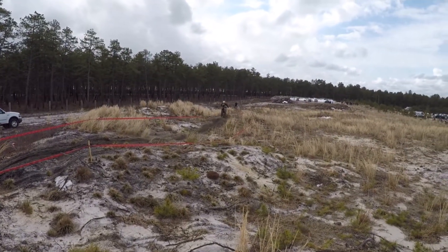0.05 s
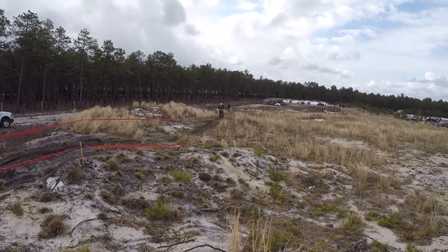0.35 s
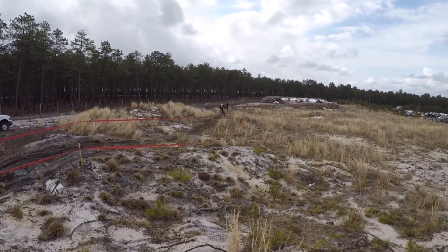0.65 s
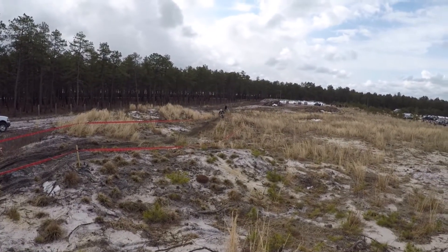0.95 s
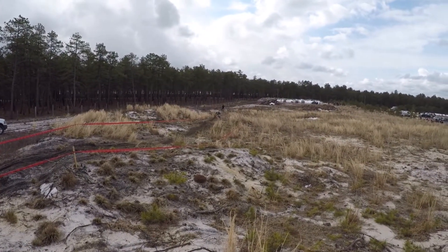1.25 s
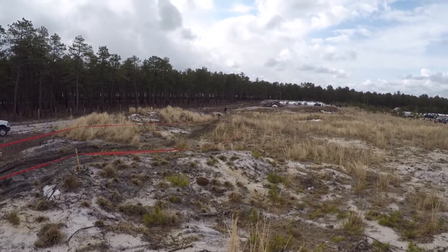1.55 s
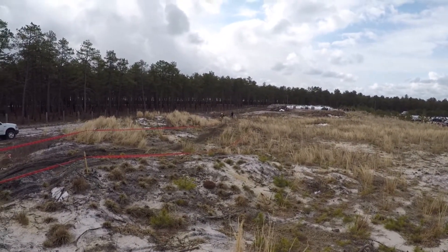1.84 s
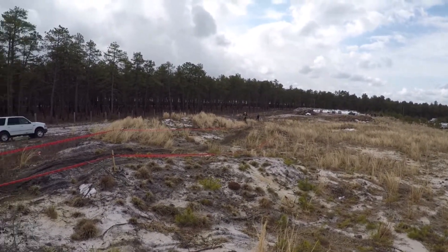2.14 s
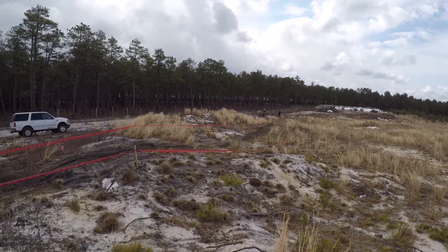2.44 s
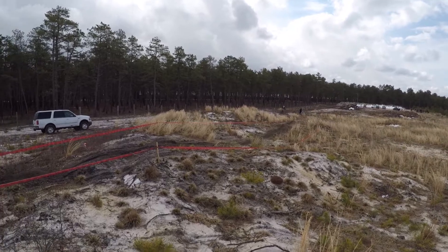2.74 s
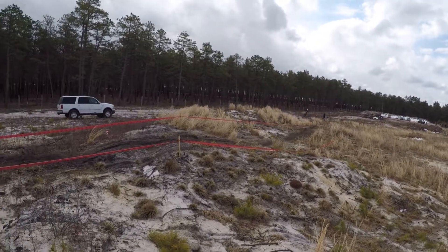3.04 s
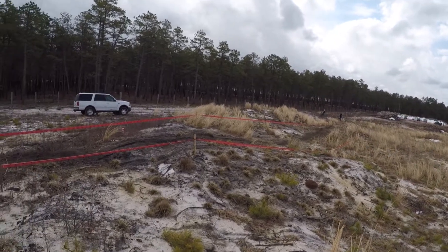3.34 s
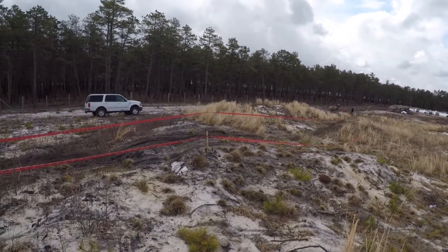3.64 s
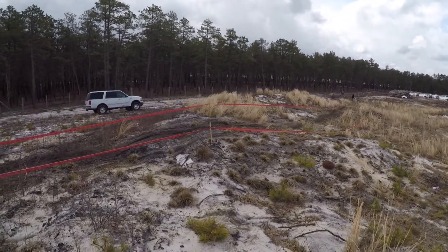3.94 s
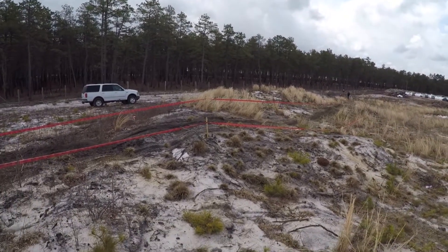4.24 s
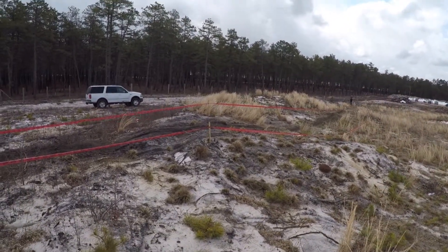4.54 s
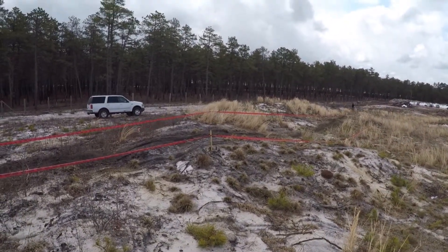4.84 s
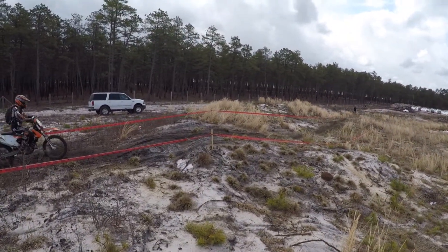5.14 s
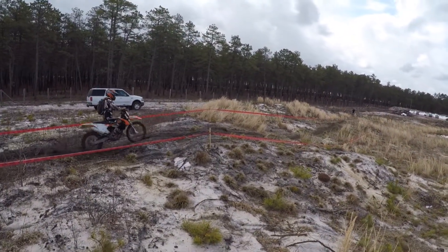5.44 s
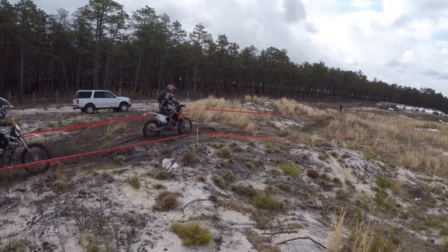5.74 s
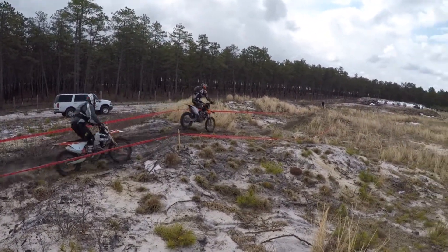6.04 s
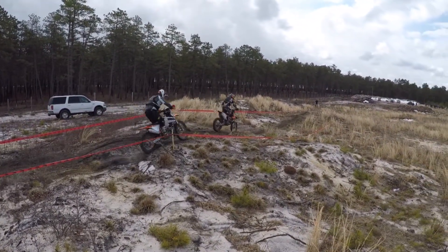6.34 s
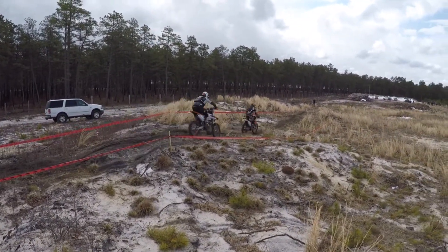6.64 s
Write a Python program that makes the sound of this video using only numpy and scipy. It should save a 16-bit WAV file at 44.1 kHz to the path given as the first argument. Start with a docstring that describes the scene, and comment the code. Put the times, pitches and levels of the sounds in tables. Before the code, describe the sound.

Dirt bike engines are heard throughout, outdoors, over a low idling throb, a distant engine din and a faint metallic clatter. A close bike gives a rasping rev at about 0.7 seconds and growls on until nearly 2 seconds, while another rides off, fading by about 3 seconds. Short, barking throttle blips come between 2.2 and 3.4 seconds. From 3.4 seconds a bike approaches, climbing unevenly in pitch, with a nasal intake honk around 4 seconds; another coasts behind it. Hoarse, more distant blips sound between 4 and 5 seconds. Sand hisses and a few small stones tick against metal from about 4 to 5.4 seconds. Two bikes pass close from 5.3 seconds with quick, cracking bursts and rattling chains, then a longer rising rev comes just after 6 seconds. Engines keep running until the end, near 7 seconds. Trees return a dull echo.

```python
"""Dirt bikes by a pine wood

Four-strokes on a sandy track: one rides off over the field, another pulls up through the revs with a
honking intake, and two pass close in short bursts of throttle. Each firing thumps the pipe, barks in
the muffler and lets out a cracking, rasping jet of gas. Underneath, more bikes idle, chains and valves
clatter and sand sprays; the trees return a dull echo."""
import sys
import numpy as np
from scipy import signal
from scipy.fft import rfft, irfft
from scipy.io import wavfile
from scipy.ndimage import uniform_filter1d, minimum_filter1d

SR = 44100
rng = np.random.default_rng(int(sys.argv[2]) if len(sys.argv) > 2 else 0)


def transcribe(signal):
    """Save signal, clipped to [-1, 1], as a 16-bit WAV file at the path in sys.argv[1]."""
    frames = np.atleast_2d(signal).T
    limited = np.clip(frames, -1, 1)
    pcm = np.round(limited * 32767).astype(np.int16)
    wavfile.write(sys.argv[1], SR, pcm)


N = 303408
TIME = np.arange(N) / SR


def gain_of(db):
    """Decibels to gain."""
    return 10 ** (np.asarray(db) / 20)

def unit_rms(x):
    """Scales to rms 1."""
    return x / np.sqrt(np.mean(x ** 2) + 1e-20)

def curve_at(points, hz):
    """Reads a curve on a log-frequency axis."""
    f, value = np.transpose(points)
    return np.interp(np.log(hz + 1), np.log(f + 1), value)

def colour(x, eq):
    """Minimum-phase EQ of unit energy, rolling off 20 dB an octave past the ends of its curve."""
    hz = abs(np.fft.fftfreq(16384, 1 / SR)) + 1
    octaves_out = np.maximum(np.log2(eq[0][0] / hz), 0) + np.maximum(np.log2(hz / eq[-1][0]), 0)
    log_gain = np.log(gain_of(np.maximum(curve_at(eq, hz) - 20 * octaves_out, -100)))
    taps = np.fft.ifft(np.exp(np.conj(signal.hilbert(log_gain)))).real[:4096]
    return signal.oaconvolve(x, taps / np.linalg.norm(taps))[:N]

def resonate(x, hz, width_hz):
    """A steep resonance of unit energy that follows the pitch curve hz."""
    carrier = np.exp(2j * np.pi * np.cumsum(hz) / SR)
    r = np.exp(-np.pi * width_hz / SR)
    baseband = signal.lfilter([(1 - r) ** 2], [1, -2 * r, r * r], x / carrier + 1e-18)
    return (carrier * baseband).real * np.sqrt(8 / (1 - r))

def train(times, sizes):
    """Impulses at the given times."""
    at = np.round(times * SR).astype(int)
    inside = (at >= 0) & (at < N)
    return np.bincount(at[inside], sizes[inside], N)

def puffs(pulses, decay_s, rise_s=0.00088):
    """Each impulse becomes a puff of turbulence of the same energy."""
    power = pulses ** 2 + 1e-20
    for r in np.exp(-2 / (np.array([decay_s, rise_s]) * SR)):
        power = signal.lfilter([1 - r], [1, -r], power)
    return np.sqrt(power) * rng.standard_normal(N)

def swell_at(s, spread_s):
    """A flat-topped swell of height 1."""
    return np.exp(-((TIME - s) / spread_s) ** 4 / 2) * (abs(TIME - s) < 2 * spread_s)

def running(x):
    """Mirrors a steady sound over its build-up, so it opens already going."""
    return np.pad(x[4096:], (4096, 0), "reflect")

def bumps(t):
    """Rough ground: a 2-9 Hz wobble, rms 1."""
    waves = (np.sin(2 * np.pi * (hz * t + rng.random())) for hz in np.geomspace(2, 9, num=12))
    return unit_rms(sum(waves))

def idle_beat(rate_hz, lope, uneven_db):
    """Loping firings of an engine at rest, rms 1."""
    gap, strength = rng.standard_normal((400, 2)).T
    fired = (np.cumsum(1 + lope * gap) - rng.random()) / rate_hz
    return unit_rms(train(fired, gain_of(uneven_db * strength)))

# Low end of the idling bikes: f/Hz, level/dB
IDLE_EQ = [(18, -60), (30, -22), (40, -6.5), (62, 0.5), (85, 2), (110, -0.5), (150, 1), (185, -12),
           (240, -14), (330, -28.5), (480, -24.5), (900, -63)]
# Their fader: t/s, level/dB
IDLE_FADER = [(0, -15.5), (1, -17), (3.2, -18), (4.2, -15), (6.88, -16)]
def idle_throb(beats):
    """The firings of bikes idling close by make a bassy throb."""
    return gain_of(np.interp(TIME, *np.transpose(IDLE_FADER))) * running(colour(beats, IDLE_EQ))

# Midrange wash of farther engines: f/Hz, level/dB
DIN_EQ = [(150, -15.5), (330, 11.5), (500, 1), (750, -2), (1050, -4), (1450, -1), (2000, -6), (3000, -10),
          (6000, -30)]
# Its fader, before trim: t/s, level/dB
DIN_FADER = [(0, -36.5), (.7, -33), (2.1, -28.5), (3.8, -29), (4.8, -26.5), (5.8, -32)]
def far_din(trim_db=-1):
    """The firings of farther engines smear into a din."""
    level = gain_of(trim_db + np.interp(TIME, *np.transpose(DIN_FADER)))
    return level * running(colour(puffs(idle_beat(75, .15, 0.46), 0.028), DIN_EQ))

# Metallic edge of valves and chains: f/Hz, level/dB
CLATTER_EQ = [(1000, 10), (2400, -8), (3700, 3), (5100, -4), (6300, -2.5), (7500, -6.5), (8700, -21),
              (12000, -28)]
def clatter(beats, valve_db=-44.5, chain_db=-35, pass_s=5.64, pass_width_s=1):
    """Valves rattle throughout; chains swell as the passing bikes come nearest."""
    nearness = 1 / (1 + ((TIME - pass_s) / pass_width_s) ** 4)
    level = np.hypot(gain_of(valve_db), gain_of(chain_db) * nearness)
    return level * running(colour(puffs(beats, 0.035, rise_s=0.0064), CLATTER_EQ))

def firings(run):
    """The moments at which an engine fires during one run."""
    s, rate = np.transpose(run)[:2]
    t = np.arange(s[0], s[-1] + .25 / rate[-1], 1 / SR)
    cycles = np.cumsum(np.interp(t, s, rate)) / SR
    return np.interp(np.arange(int(cycles[-1]) + 1), cycles, t)

def pressure_front(sweep_s=0.002555, top_hz=2200):
    """The pressure front leaves the pipe as a quick upward chirp."""
    hz = np.fft.rfftfreq(512, 1 / SR)
    delay = sweep_s * np.minimum(hz / top_hz, 1)
    return irfft(np.exp(-2j * np.pi * np.cumsum(delay) * hz[1]))

def sway(depth_db):
    """Gain that wanders as a bike bucks over the bumps and its pipe swings about."""
    t = np.arange(0, N / SR + .1, .01)
    return gain_of(depth_db * np.interp(TIME, t, bumps(t)))

def tailpipe(crack, pitch_hz=1493, wander=0.14):
    """Each crack rings the tailpipe; hot gas shifts the pitch."""
    knots = np.arange(0, N / SR + .1, .03)
    heat = np.interp(TIME, knots, rng.standard_normal(len(knots)))
    return resonate(crack, pitch_hz * (1 + wander * heat), width_hz=162)

VALVE_LEAD_S = .0013  # the valve opens just before the crack peaks
# Sizzle of the escaping gas: f/Hz, level/dB
RASP_EQ = [(1000, -59), (2400, 1), (3600, 3.5), (5000, -6), (6300, -2.5), (7500, -5.5), (8700, -24.5),
           (10500, -23), (14500, -65)]
def engine(runs, pipe_eq, bark_eq, crack_eq, *, boom_db, boom_slope, bark_db, crack_db, rasp_db,
           ring_db, crack_s, rasp_s, crack_noise=.06, bark_noise=.01, uneven_db=.6, jitter_s=6e-5):
    """One cylinder: each firing booms, barks, cracks and rasps; *_noise is the share of turbulence."""
    boom, bark, crack, rasp = np.zeros((4, N))
    for run in runs:  # rows: t/s, rate/Hz, bark/dB, crack/dB, rasp/dB
        s, rate, *levels = np.transpose(run)
        fired = firings(run)
        late, strength = rng.standard_normal((len(fired), 2)).T
        size = np.sqrt(SR / np.interp(fired, s, rate)) * gain_of(uneven_db * strength)
        load, throttle, gas = (np.interp(fired, s, level) for level in levels)
        fired = fired + jitter_s * late - VALVE_LEAD_S
        boom += train(fired, size * gain_of(boom_db + boom_slope * load))  # grows slowly with load
        bark += train(fired, size * gain_of(bark_db + load))
        crack += train(fired, size * gain_of(crack_db + throttle))
        rasp += train(fired, size * gain_of(rasp_db + gas))
    bark = np.sqrt(1 - bark_noise) * bark + np.sqrt(bark_noise) * puffs(bark, 0.007)
    fronts = signal.oaconvolve(crack, pressure_front())[:N]
    jet = np.sqrt(1 - crack_noise) * fronts + np.sqrt(crack_noise) * puffs(crack, crack_s)
    body = sway(0.5) * colour(boom, pipe_eq) + sway(0.1) * colour(bark, bark_eq)
    hiss = gain_of(-3) * colour(puffs(rasp, rasp_s), RASP_EQ)
    ring = gain_of(ring_db) * tailpipe(crack)
    return colour(jet, crack_eq) + ring - body + hiss + shock_fronts(rasp)

def burst(start, held_s, first_hz, last_hz, bark_db, crack_db, rasp_db):
    """One blip as an engine run: revs glide while the throttle is held, then revs and level sag."""
    attack_s, attack_db = 0.013, -3.5
    release_s, release_db_per_s, sag_s = 0.08, 237, .28
    t = np.linspace(0, held_s + release_s, num=100)
    shut_s = np.maximum(t - held_s, 0)
    rate = np.interp(t, [0, held_s], [first_hz, last_hz]) * np.exp(-shut_s / sag_s)
    throttle = attack_db * np.maximum(1 - t / attack_s, 0) - release_db_per_s * shut_s
    blast = throttle + np.where(t < held_s, 0.5 * (1 - t / held_s), -1)  # crack and rasp taper, dB
    lugging = -7 * np.log2(rate / 42.4)  # dB: the bark is hardest at low revs
    bark = bark_db + lugging + throttle
    return np.transpose([start + t, rate, bark, crack_db + blast, rasp_db + blast])

# Throttle cues: t/s, hold/s, first and last firing rate/Hz, bark/dB, crack/dB, rasp/dB, place
THROTTLE_CUES = [ (0.04, 0.063, 31.36, 38.84, -25.5, -34, -40, "facing"),
                 (.68, 0.22, 34.84, 65.6, -17.5, -24, -33.5, "near"),
                 (2.217, 0.085, 31.24, 46.9, -19, -17.5, -36, "facing"),
                 (2.514, 0.14, 59.5, 72.67, -16.5, -20.5, -41.5, "facing"),
                 (3.013, 0.06, 41.8, 63.1, -18.5, -25, -36, "near"),
                 (3.247, 0.1, 44.64, 71.5, -14.5, -23, -31, "near"),
                 (4.11, 0.19, 36.45, 37.73, -23.5, -29, -46, "far"),
                 (4.352, 0.2, 36.73, 39.29, -28, -24, -46, "far"),
                 (5.027, 0.13, 36.03, 41.9, -38, -25, -98, "far"),
                 (5.372, 0.096, 33.13, 47.3, -20.5, -21.5, -28, "facing"),
                 (5.508, 0.12, 36.8, 26.5, -26, -27, -33.5, "facing"),
                 (5.66, 0.15, 31.54, 48, -15, -19.5, -28.5, "facing"),
                 (5.879, 0.08, 31.78, 40.44, -23.5, -23.5, -34.5, "facing"),
                 (6.131, .315, 30.29, 74.2, -17, -20.5, -29.5, "near"),
                 (6.715, 0.092, 31.67, 34.25, -27.5, -36, -40, "near"), ]
def bursts_at(place):
    """All bursts of throttle from one place: "facing", "near" or "far"."""
    return [burst(*cue[:-1]) for cue in THROTTLE_CUES if cue[-1] == place]

# Pipe boom of the close bikes, and their head-on bark and crack: f/Hz, level/dB
CLOSE_PIPE_EQ = [(22, -30.5), (50, 10), (70, 4), (120, 15), (170, 10.5), (240, -10.5), (600, -58)]
FACING_BARK_EQ = [(120, -26), (240, 0.5), (320, 9.5), (390, 0.5), (480, 0.5), (600, -3), (800, -29),
                  (1500, -62.5)]
FACING_CRACK_EQ = [(250, -14.5), (500, 2), (750, 7.5), (1020, 2), (1320, 10.5), (1600, -9.5), (1950, 3.5),
                   (2600, -6.5), (5000, -28.5)]
def facing_bursts():
    """Close blips with the pipe pointing at the listener."""
    return engine(bursts_at("facing"), CLOSE_PIPE_EQ, FACING_BARK_EQ, FACING_CRACK_EQ,
                  boom_db=-15, boom_slope=0.22, bark_db=-6.5, crack_db=-7, rasp_db=-1.5, ring_db=-7,
                  crack_s=0.0032, rasp_s=0.0091, uneven_db=1.1)

# The common muffler bark, and the close exhaust crack: f/Hz, level/dB
BARK_EQ = [(120, -29.5), (220, -3), (290, 5.5), (350, 0), (430, -9.5), (560, -11), (750, -24.5),
           (1500, -74.5)]
NEAR_CRACK_EQ = [(250, -15), (520, 3.5), (730, -4), (1000, 4.5), (1220, 6), (1440, 2), (1600, 0), (1780, 3),
                 (2100, -3.5), (2700, -10), (5000, -28.5)]
def near_bursts():
    """Close, lumpy blips with the pipe turned aside."""
    return engine(bursts_at("near"), CLOSE_PIPE_EQ, BARK_EQ, NEAR_CRACK_EQ,
                  boom_db=-9, boom_slope=0.4, bark_db=-3.5, crack_db=-5.5, rasp_db=0.5, ring_db=-5,
                  crack_s=0.0061, rasp_s=0.012, uneven_db=2)

# Ringing accents: t/s, spread/s, f/Hz, send level/dB
RING_CUES = [(.73, .025, 1720, -8), (.835, .05, 1480, -4), (.84, .07, 320, 2), (2.285, .025, 1400, -5),
             (3.32, .07, 285, 2), (5.72, .08, 440, -1), (6.27, .13, 360, -1.5), (6.38, .05, 1350, -4)]
# Their bandwidth: f/Hz, width/Hz
RING_WIDTHS = [(300, 194), (1500, 360)]
def ring_out(runs):
    """Under full throttle the firings set muffler and tailpipe ringing in brief swells."""
    cracks = np.zeros(N)
    for run in runs:
        s, rate, _, crack_db, _ = run.T
        fired = firings(run)
        sizes = np.interp(fired, s, np.sqrt(SR / rate) * gain_of(crack_db))
        cracks += train(fired - VALVE_LEAD_S, sizes)
    out = np.zeros(N)
    for s, spread, hz, db in RING_CUES:
        drive = cracks * gain_of(db) * swell_at(s, spread)
        out += resonate(drive, np.full(N, hz), curve_at(RING_WIDTHS, hz))
    return out

def ride(course, crack_db, rasp_db, head_s, head_db, tail_s, tail_db, bite=0):
    """A long engine run: the bark follows the load; the crack ramps at each end as the pipe turns."""
    s, rate, load = np.transpose(course)
    t = np.arange(s[0], s[-1], .01)
    head = head_db * np.maximum(1 - (t - s[0]) / head_s, 0)
    tail = tail_db * np.maximum(1 - (s[-1] - t) / tail_s, 0)
    revs = uniform_filter1d(np.interp(t, s, rate), size=5, mode="nearest")  # flywheel inertia
    revs *= 1 + 0.0015 * bumps(t)
    pull = np.interp(t, s, load)
    strain = bite * (pull - load.mean())
    return np.transpose([t, revs, pull, crack_db + head + tail + strain, rasp_db + strain])

# Riding off: t/s, firing rate/Hz, load/dB
LEAVING_COURSE = [ (.8, 49.26, -40), (1.0, 51.82, -32.5), (1.22, 54.99, -32), (1.47, 54.64, -30),
                  (1.59, 53.35, -31), (1.74, 58.3, -28), (1.86, 60.17, -30), (1.98, 55.15, -28.5),
                  (2.12, 49.16, -31.5), (2.22, 49.4, -39), (2.33, 53.67, -29.5), (2.54, 50.08, -26.5),
                  (2.74, 48.39, -29.5), (2.9, 62.97, -19), (3.02, 57.51, -23.5), (3.25, 48.45, -31)]
# Its pipe boom and exhaust crack: f/Hz, level/dB
LEAVING_PIPE_EQ = [(25, -42), (54, -5.5), (80, -5), (110, 2.5), (160, -15), (195, -3.5), (235, -7.5),
                   (270, -22.5), (600, -74.5)]
LEAVING_CRACK_EQ = [(250, -67), (520, -0.5), (780, 4), (1000, 1.5), (1350, 2), (1800, -8), (2600, -18.5),
                    (5000, -45)]
def leaving_bike():
    """A bike rides off over the field, its crack and rasp biting harder under load."""
    run = ride(LEAVING_COURSE, crack_db=-26.5, rasp_db=-47,
               head_s=0.3, head_db=-7.5, tail_s=0.4, tail_db=-8, bite=0.29)
    return engine([run], LEAVING_PIPE_EQ, BARK_EQ, LEAVING_CRACK_EQ,
                  boom_db=-5, boom_slope=.45, bark_db=-9, crack_db=-6, rasp_db=-4.5, ring_db=-9,
                  crack_s=0.0005, rasp_s=0.006, crack_noise=.04, jitter_s=1e-5)

# Sprays of sand: t/s, peak level/dB, spread/s
SAND_CUES = [(.85, -61, 0.18), (2.5, -51.5, 0.44), (4.6, -46.5, 1.03), (4.832, -35.5, 0.083),
             (5.25, -60, 0.42)]
# Their airy hiss: f/Hz, level/dB
SAND_EQ = [(4000, -7.5), (7000, 2), (9800, 0), (11300, -30.5), (14500, -21)]
def sand_spray(beats, trim_db=-2):
    """Tyres throw sand in swells of fluttering hiss."""
    level = sum(gain_of(db) * np.exp(-abs(TIME - s) / spread) for s, db, spread in SAND_CUES)
    return gain_of(trim_db) * level * colour(puffs(beats, 0.036, rise_s=0.005), SAND_EQ)

# Exhaust blasts: t/s, spread/s, send level from the rasp/dB
BLAST_CUES = [(.88, 0.065, 0), (2.26, 0.021, -5), (2.58, 0.079, 0.5), (3.05, 0.031, -8), (3.305, 0.021, 9),
              (3.376, .04, 2), (6.4, 0.081, -5.5)]
# Ring of a shock front: f/Hz, level/dB
SHOCK_EQ = [(1200, -14), (2000, 3), (2700, 3.5), (3400, -1), (4300, 0), (4900, -13), (7000, -33)]
def shock_fronts(rasp):
    """Blasts aimed at the listener arrive as short, ringing shock fronts."""
    aim = sum(gain_of(db) * swell_at(s, spread) for s, spread, db in BLAST_CUES)
    return colour(puffs(rasp * aim, decay_s=.0013, rise_s=0.00031), SHOCK_EQ)

# Three stretches of riding on, each: t/s, firing rate/Hz, load/dB
CRUISING_COURSES = [
    [(1.0, 36, -28), (1.12, 40, -20.5), (1.25, 49, -20.5), (1.33, 49.5, -20), (1.42, 58, -18),
     (1.52, 50, -17), (1.59, 51, -18.5), (1.69, 55.6, -19), (1.75, 57, -42.5)],
    [(3.1, 50.13, -29.5), (3.34, 60.17, -25.5), (3.5, 58.2, -29.5), (3.63, 54.1, -24.5),
     (3.72, 52.9, -46.5)],
    [(6.52, 60.34, -32.5), (6.7, 60.9, -36.5), (6.88, 65.27, -40)],
]
# Muffler under steady load: f/Hz, level/dB
GROWL_EQ = [(120, -25), (210, -2.5), (265, 6), (330, 3), (385, -4.5), (450, -11), (750, -24.5),
            (1500, -72.5)]
def cruising_bike():
    """A close bike growls on after a burst."""
    runs = [ride(course, crack_db=-42, rasp_db=-49, head_s=0.12, head_db=2.5, tail_s=0.18, tail_db=-4)
            for course in CRUISING_COURSES]
    return engine(runs, CLOSE_PIPE_EQ, GROWL_EQ, NEAR_CRACK_EQ,
                  boom_db=-22, boom_slope=0.015, bark_db=-2.5, crack_db=-5, rasp_db=-6.5, ring_db=-3,
                  crack_s=.004, rasp_s=0.0097)

# The climb, rear wheel slipping and gripping: t/s, firing rate/Hz, load/dB
APPROACHING_COURSE = [ (3.382, 67.23, -17.5), (3.52, 68.12, -34.5), (3.7, 60.47, -25), (3.83, 67.92, -26),
                      (4.12, 81.4, -32.5), (4.3, 81.27, -27), (4.39, 74.3, -32.5), (4.52, 79.26, -25.5),
                      (4.7, 85.92, -21), (4.78, 82.04, -27.5), (4.84, 89.5, -21.5), (4.9, 84.6, -22.5),
                      (4.98, 89.8, -20.5), (5.2, 84.83, -26), (5.3, 91.28, -20), (5.37, 86.24, -27.5),
                      (5.5, 90.55, -17), (5.6, 89.93, -28), (5.69, 99.1, -38)]
# Its pipe boom and bright exhaust crack: f/Hz, level/dB
APPROACHING_PIPE_EQ = [(30, -64), (55, -1.5), (75, 0), (90, -1), (125, 0), (160, 0.5), (190, -2.5),
                       (225, -17), (265, -8), (330, -26.5), (600, -74)]
BRIGHT_CRACK_EQ = [(250, -20.5), (500, -0.5), (950, -7.5), (1300, 1), (1490, 0), (1720, 1), (2100, -1),
                   (2800, -3.5), (3300, -8.5), (5000, -29)]
def approaching_bike():
    """A bike pulls up through the revs, its intake honking in step with the exhaust."""
    run = ride(APPROACHING_COURSE, crack_db=-33.5, rasp_db=-37,
               head_s=.6, head_db=0.5, tail_s=3.7, tail_db=4.5)
    exhaust = engine([run], APPROACHING_PIPE_EQ, BARK_EQ, BRIGHT_CRACK_EQ,
                     boom_db=-16.5, boom_slope=0.085, bark_db=-4.5, crack_db=-5, rasp_db=-3, ring_db=-4,
                     crack_s=0.0025, rasp_s=0.0042, crack_noise=.12, jitter_s=4e-5)
    return exhaust + intake_honk(run)

# Swells of intake honk: t/s, spread/s, f/Hz, level/dB
HONK_CUES = [(3.83, 0.14, 1600, -30.5), (4.06, 0.09, 1530, -32), (4.27, 0.09, 1470, -29)]
def intake_honk(run, glide_hz_per_s=-600, upper_ratio=1.81, upper_db=-10):
    """Gulps of air, one per firing, ring two airbox resonances in nasal, sinking swells."""
    cycles = np.cumsum(np.interp(TIME, run[:, 0], run[:, 1])) / SR
    strokes = np.diff(np.floor(cycles), prepend=0)
    gulps = unit_rms(puffs(strokes, decay_s=.0007))
    out = np.zeros(N)
    for s, spread, hz, db in HONK_CUES:
        pitch = hz + glide_hz_per_s * (TIME - s)
        air = gain_of(db) * swell_at(s, spread) * gulps
        out += resonate(air, pitch, width_hz=450)
        out += gain_of(upper_db) * resonate(air, upper_ratio * pitch, width_hz=650)
    return out

# Coasting along: t/s, firing rate/Hz, load/dB
COASTING_COURSE = [ (3.65, 59.73, -29.5), (3.9, 73, -30.5), (4.2, 72.5, -36.5), (4.45, 76.3, -24.5),
                   (4.7, 81.66, -33), (5.3, 77.03, -33), (5.6, 74.7, -23.5), (5.87, 63.55, -26),
                   (6.08, 75.3, -29.5), (6.3, 68.32, -32.5), (6.53, 77.4, -27.5), (6.88, 75.52, -27)]
# Its pipe boom: f/Hz, level/dB
COASTING_PIPE_EQ = [(30, -10.5), (72, -17.5), (145, -3.5), (200, -10.5), (300, -38), (600, -41.5)]
def coasting_bike():
    """A bike follows on a nearly shut throttle, its crack almost all breath."""
    run = ride(COASTING_COURSE, crack_db=-40.5, rasp_db=-66,
               head_s=0.93, head_db=-23.5, tail_s=1, tail_db=-2.5)
    return engine([run], COASTING_PIPE_EQ, BARK_EQ, BRIGHT_CRACK_EQ,
                  boom_db=-5.5, boom_slope=0.52, bark_db=-5, crack_db=5.5, rasp_db=3, ring_db=-16.5,
                  crack_s=0.026, rasp_s=0.0079, crack_noise=0.99, bark_noise=.06, jitter_s=1e-4)

# Dull exhaust crack from far off: f/Hz, level/dB
FAR_CRACK_EQ = [(300, -46), (520, -4), (780, 6.5), (1000, 3), (1350, -6.5), (2600, -20), (5000, -45)]
def far_bursts():
    """Hoarse blips of throttle carry from far over the field."""
    return engine(bursts_at("far"), LEAVING_PIPE_EQ, BARK_EQ, FAR_CRACK_EQ,
                  boom_db=-17, boom_slope=0.12, bark_db=-3, crack_db=-5.5, rasp_db=5.5, ring_db=-21,
                  crack_s=0.00055, rasp_s=0.0034, crack_noise=.04, bark_noise=.06,
                  uneven_db=1, jitter_s=2e-5)

# Ticks and pings: t/s, peak level/dB, t60/s
TICK_CUES = [(4.182, -18.5, 0.038), (4.734, -38, 0.075), (5.165, -32, 0.086), (5.267, -28.5, 0.091),
             (5.36, -24.5, 0.11), (5.38, -30, 0.1), (6.412, -34, 0.012)]
def ticks(trim_db=-5):
    """Sharp metal ticks, and high pings from chains and brakes."""
    envelope = sum(gain_of(db - 60 * abs(TIME - s) / t60) * (TIME >= s) for s, db, t60 in TICK_CUES)
    tick_eq = [(2500, -1.5), (6500, 8), (9500, 4), (12000, -10), (15000, -13)]
    return gain_of(trim_db) * colour(envelope * rng.standard_normal(N), tick_eq)

# Reverb time of the wood: f/Hz, t60/s
WOOD_DECAY = [(100, 1), (500, 0.6), (2000, 0.25), (8000, 0.33)]
def tree_echo(x, predelay_s=0.028, echoes_per_s=2000):
    """Scattered echoes from the trunks, the bass lingering longest."""
    taps = rng.standard_normal(SR) * (rng.random(SR) < echoes_per_s / SR)
    taps *= np.arange(SR) > predelay_s * SR
    hz, t, spectrum = signal.stft(taps, SR, nperseg=256)
    decay = gain_of(-60 * t / curve_at(WOOD_DECAY, hz)[:, None])
    tail = signal.istft(spectrum * decay, SR, nperseg=256)[1]
    return signal.oaconvolve(x, tail / np.linalg.norm(tail))[:N]

def ambience():
    """The bed: the far din, plus throb, clatter and sand pulsing with three idling engines."""
    beats = unit_rms(idle_beat(21, 0.0677, 0.67) + idle_beat(27, 0.0495, 1.1) + idle_beat(33, 0.0393, 3))
    return idle_throb(beats) + far_din() + clatter(beats) + sand_spray(beats)

# Stereo width: f/Hz, side level/dB
WIDTH_EQ = [(30, -0.5), (70, -16.5), (130, -25.5), (280, -22.5), (550, -11.5), (1100, -4.5), (2400, -6.5),
            (4500, -5), (7000, 3.5), (12000, -2.5)]
# Pan by frequency: f/Hz, share leaning left
LEFT_LEAN = [(40, 0.11), (250, -0.0051), (650, 0.16), (1400, 0.37), (3000, 0.23), (6000, 0.042),
             (10000, -0.28)]
def microphone(direct, ahead, across, scatter_s=0.0031, scatter_db=-2, across_db=1):
    """Two ports share the bass; their housing scatters the treble; diffuse sound differs at each."""
    hz = np.fft.rfftfreq(N, 1 / SR)
    scatter = rfft(rng.standard_normal(N) * np.exp(-np.minimum(TIME / scatter_s, 50)))
    phase = np.where(hz < 450, 1j, scatter / abs(scatter))  # long waves just reach one port later
    width = gain_of(scatter_db) * phase * rfft(direct) + gain_of(across_db) * rfft(across)
    mid = direct + ahead
    side = irfft(rfft(mid) * curve_at(LEFT_LEAN, hz) + gain_of(curve_at(WIDTH_EQ, hz)) * width, N)
    return np.array([mid + side, mid - side])

def scene():
    """Bikes and metal ticks up front, echo and ambience spread around them."""
    bikes = facing_bursts() + near_bursts() + ring_out(bursts_at("near") + bursts_at("facing"))
    bikes += leaving_bike() + cruising_bike() + approaching_bike() + coasting_bike() + far_bursts()
    ahead, across = (gain_of(-12.5) * tree_echo(bikes) + ambience() for _ in range(2))
    return microphone(bikes + ticks(), ahead, across)

def record(dry, ceiling=.98, release_db_per_s=150, cutoff_hz=14900):
    """A peak limiter, then a steep low-pass."""
    over_db = np.maximum(20 * np.log10(abs(dry).max(0) / ceiling + 1e-9), 0)
    peak_db = -minimum_filter1d(-over_db, size=90)
    release = TIME * release_db_per_s
    reduction_db = np.maximum.accumulate(peak_db + release) - release
    limited = dry / gain_of(uniform_filter1d(reduction_db, size=90))
    lowpass = signal.firwin(511, cutoff_hz, window=("kaiser", 9), fs=SR)
    return signal.oaconvolve(limited, lowpass[None], "same")


dry = scene()
out = record(dry)
transcribe(out)
```